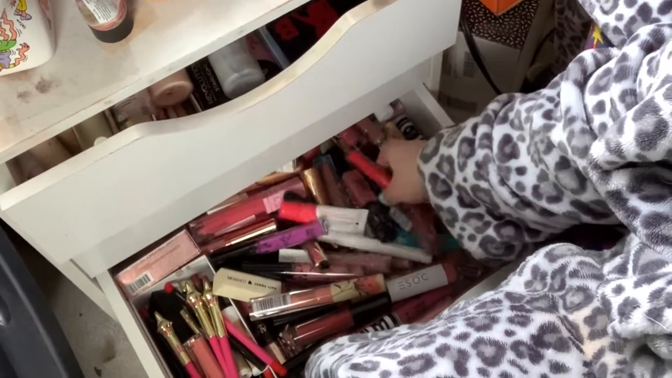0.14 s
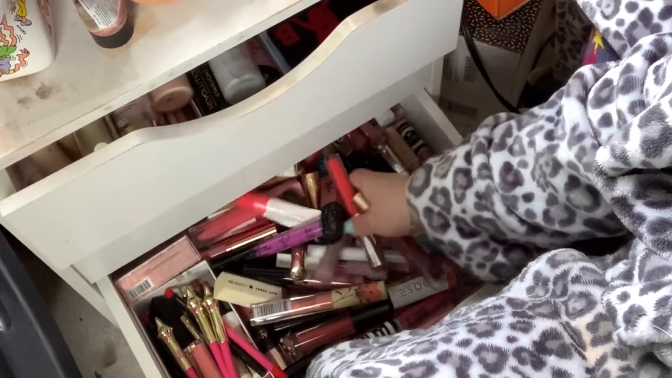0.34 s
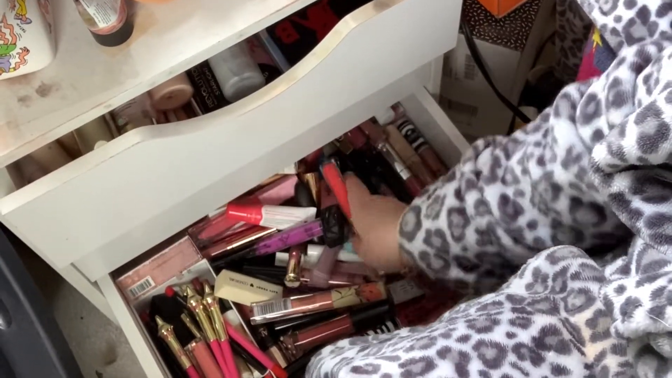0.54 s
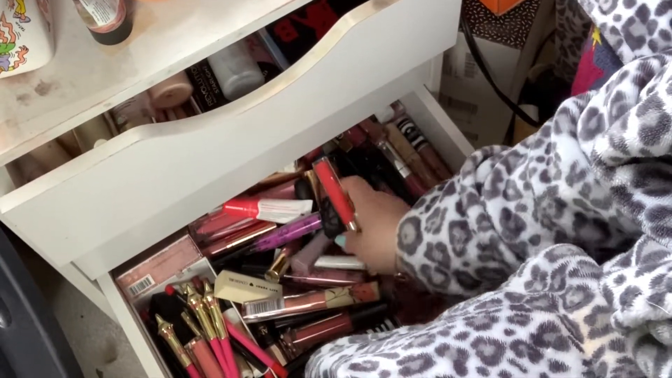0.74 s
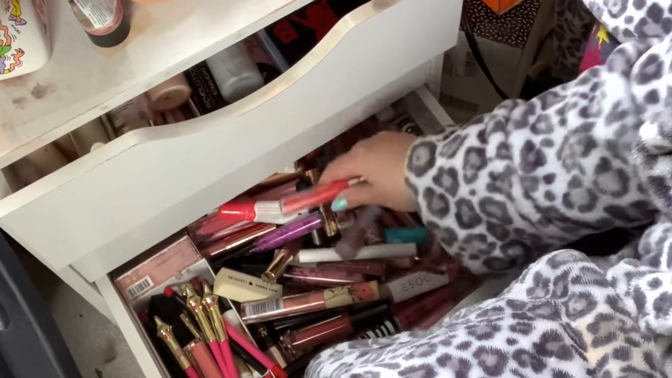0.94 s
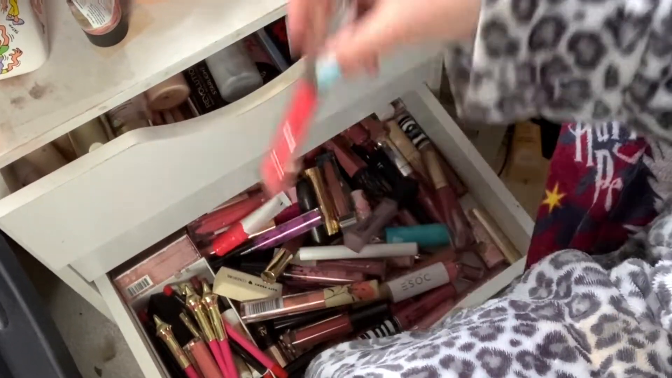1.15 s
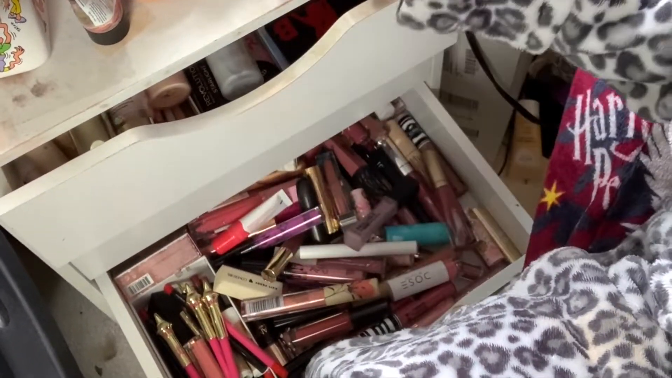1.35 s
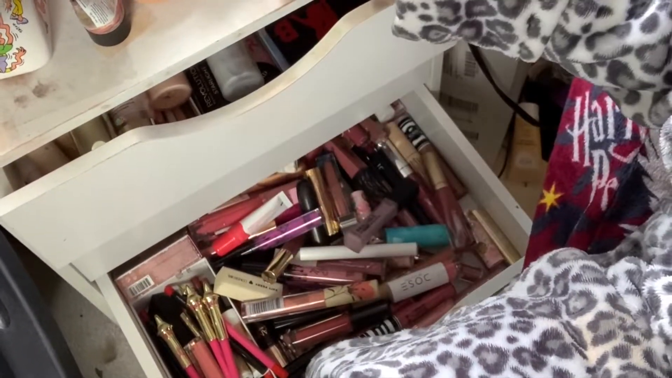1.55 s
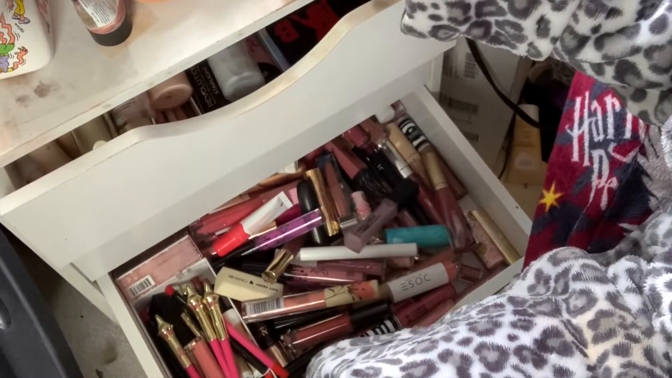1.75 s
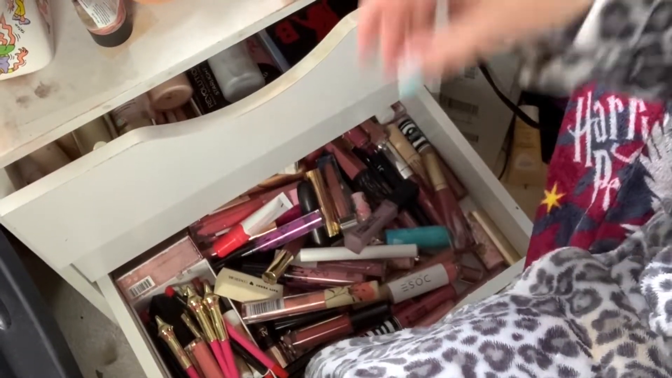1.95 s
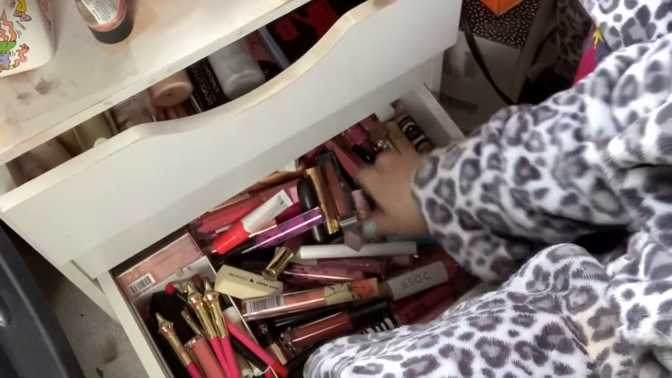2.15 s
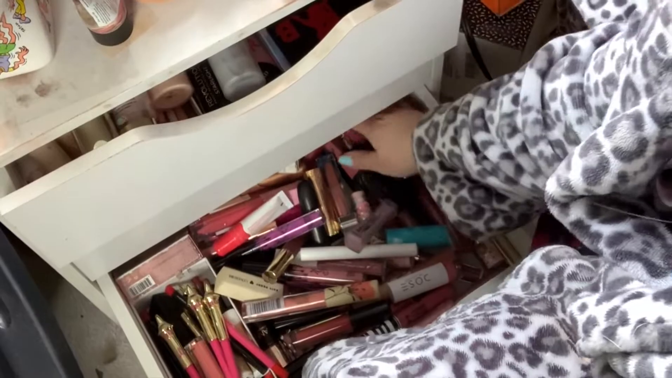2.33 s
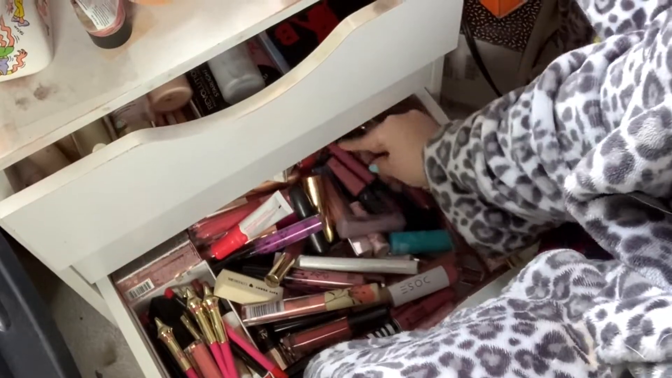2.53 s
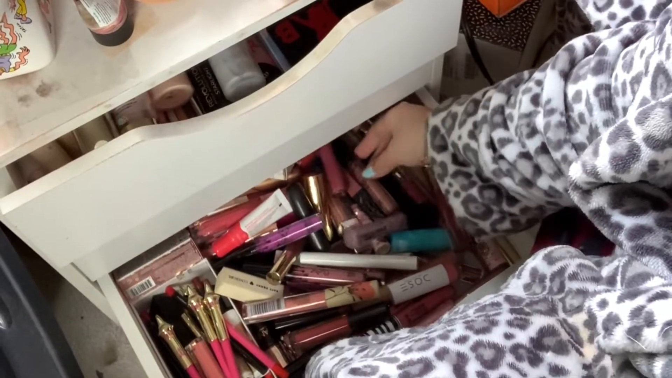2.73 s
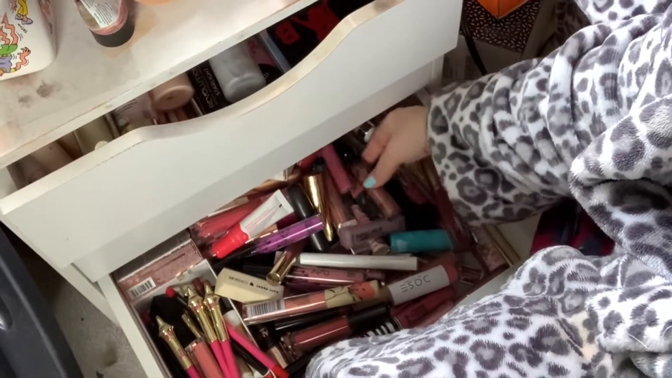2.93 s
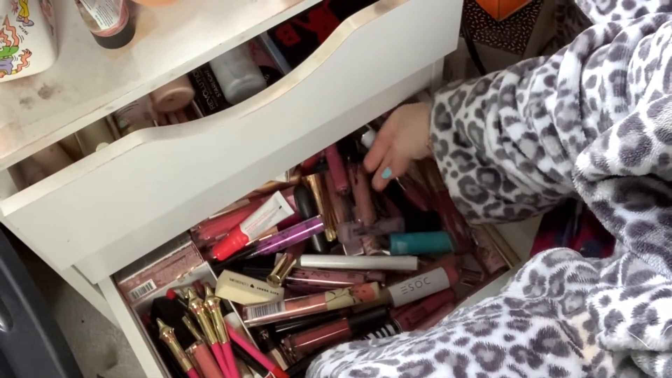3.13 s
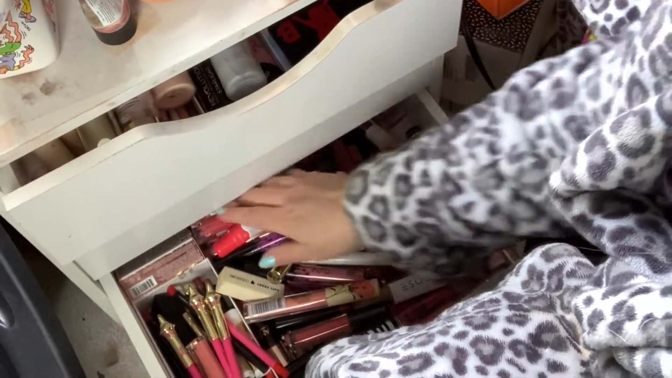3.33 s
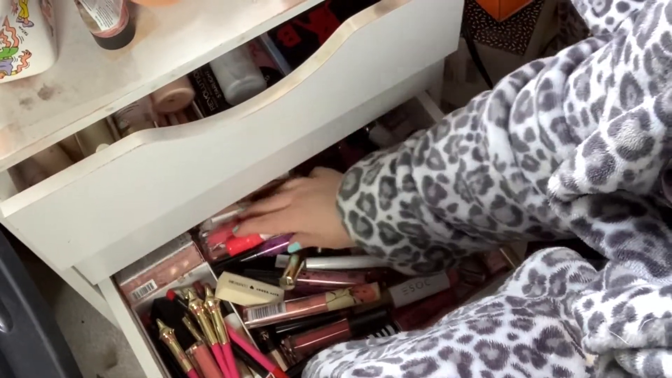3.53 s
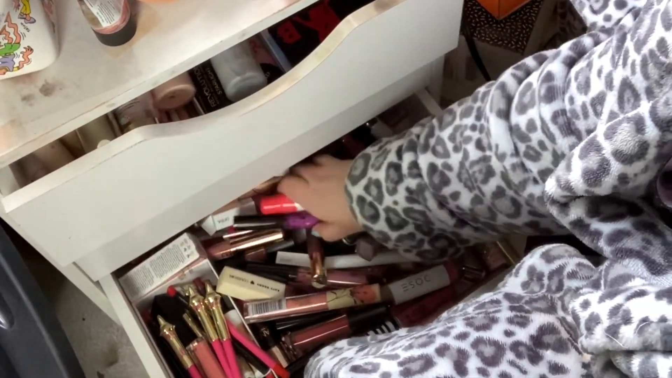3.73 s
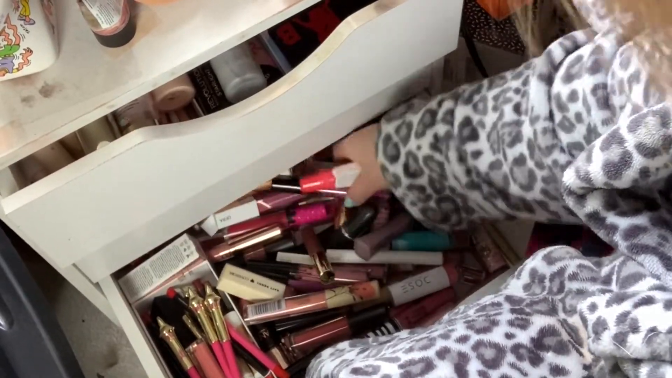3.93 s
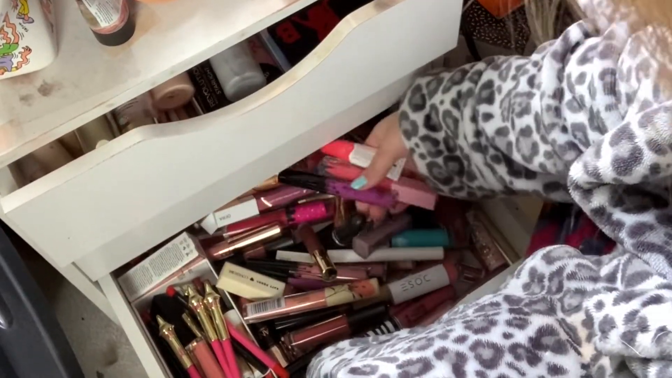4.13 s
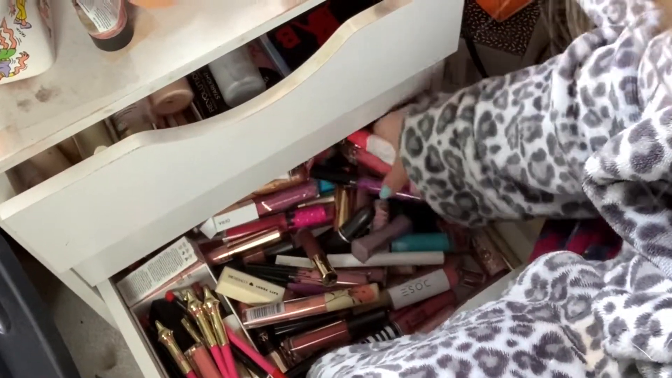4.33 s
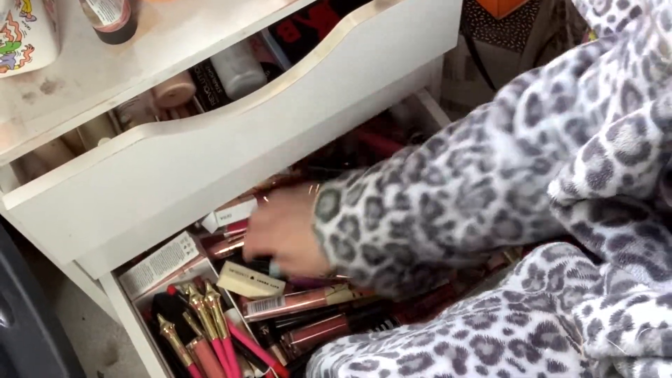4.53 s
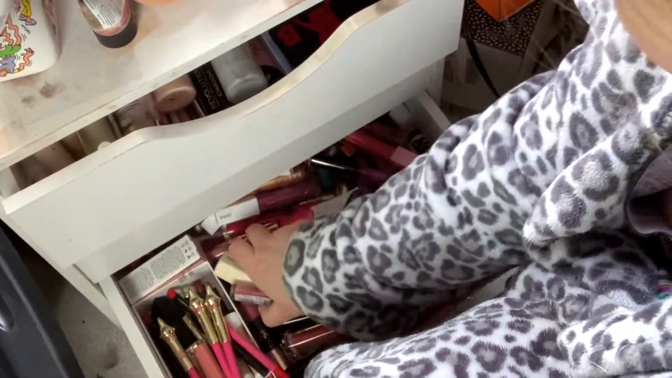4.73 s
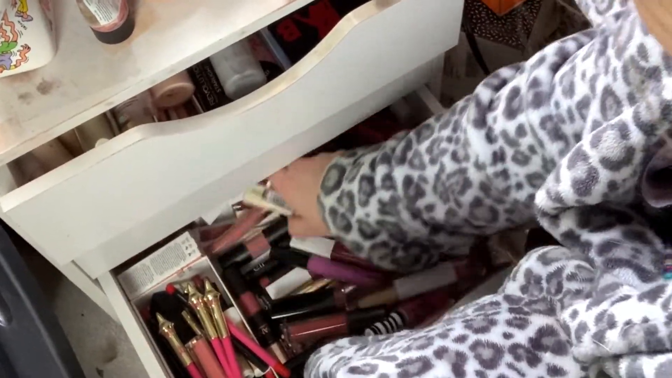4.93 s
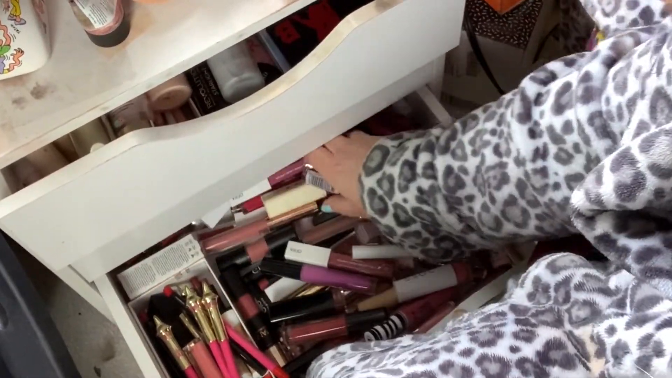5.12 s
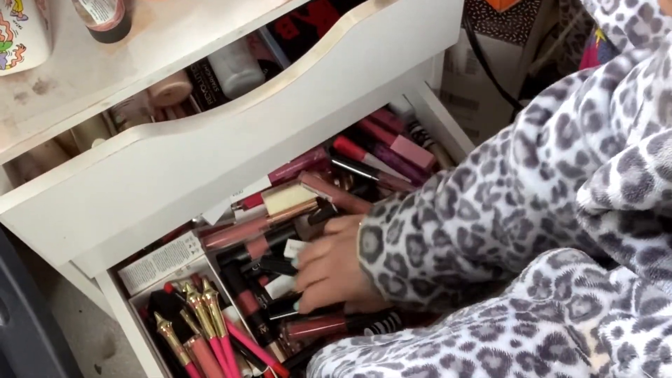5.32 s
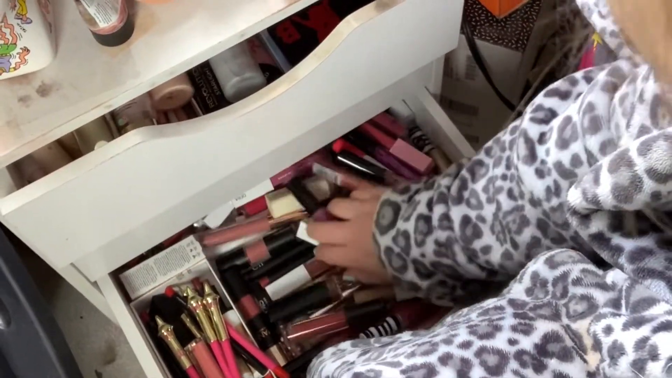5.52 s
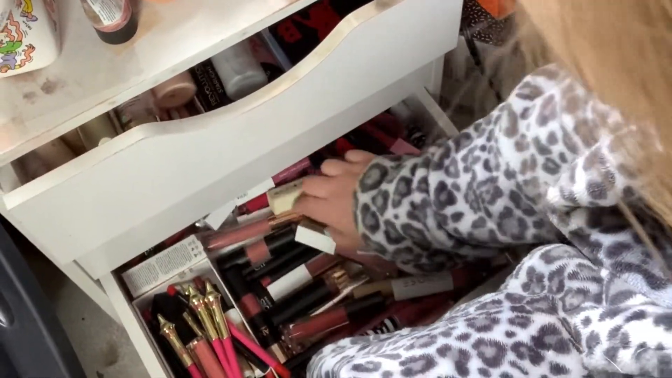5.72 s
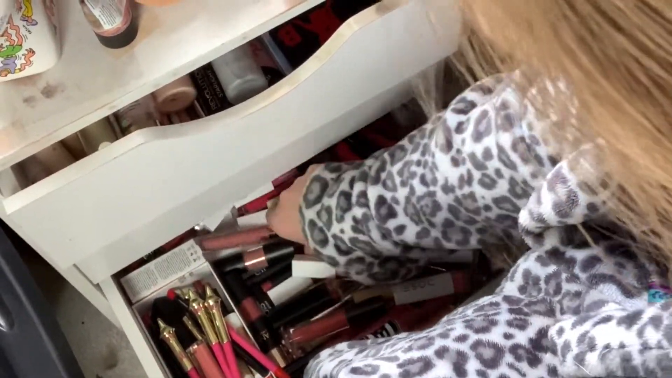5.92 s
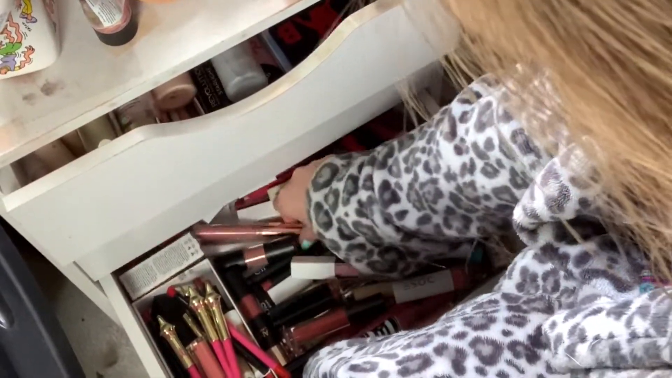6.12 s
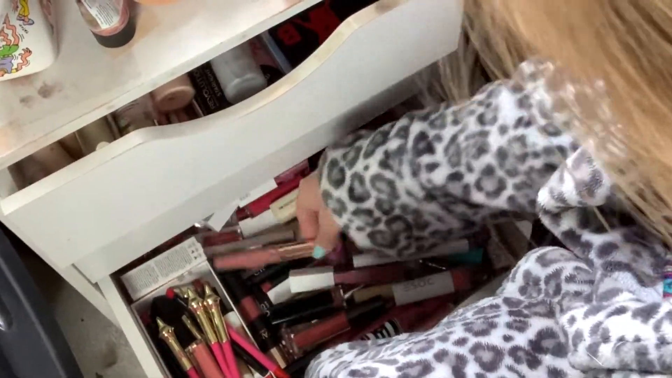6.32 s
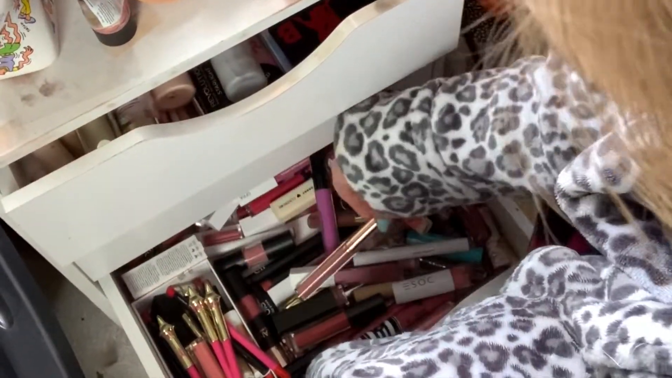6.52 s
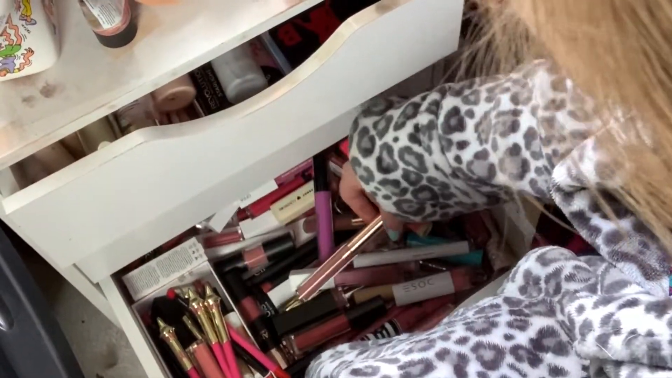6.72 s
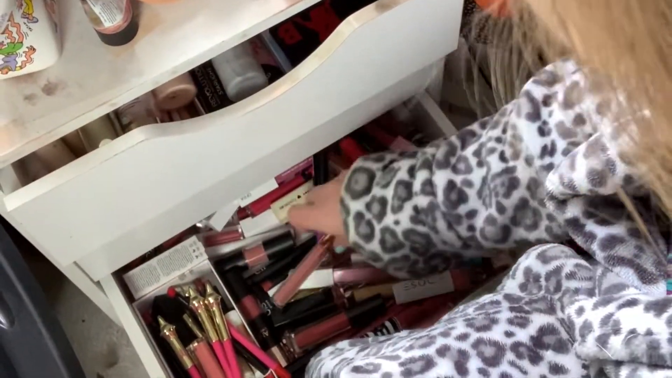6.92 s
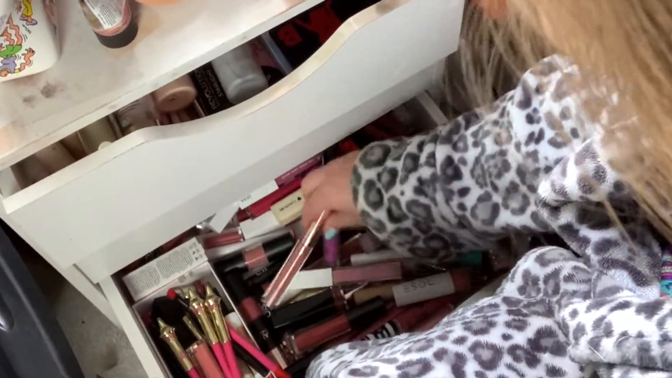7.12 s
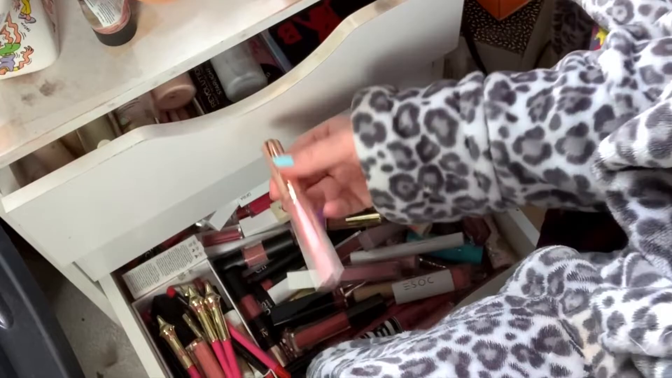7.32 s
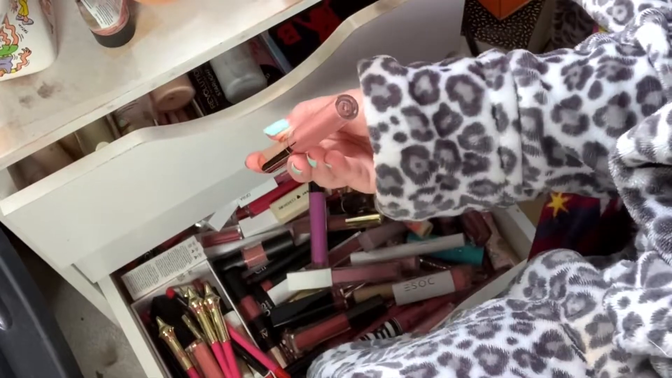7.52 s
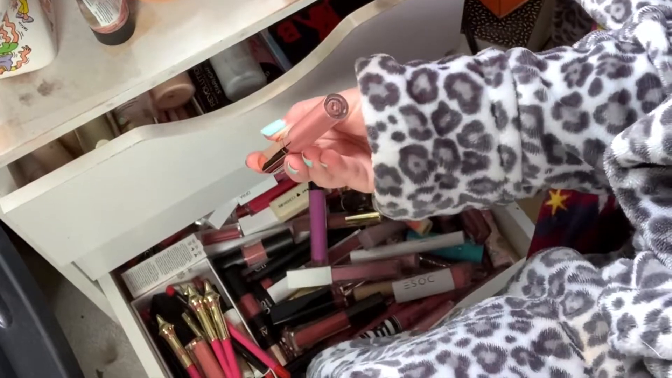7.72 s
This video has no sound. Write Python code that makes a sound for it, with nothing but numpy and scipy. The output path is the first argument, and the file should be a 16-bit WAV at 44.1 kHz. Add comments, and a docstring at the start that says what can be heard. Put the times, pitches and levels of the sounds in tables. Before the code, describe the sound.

Close stereo pickup of a drawer full of plastic lipstick tubes being stirred by hand. Dense sharp clicks and clatter fill the first second, then near silence with one click and soft sleeve rustle. Rummaging resumes after two seconds in uneven bursts with sliding hiss and dull drawer knocks, thins out after six seconds and ends nearly quiet in a small furnished room.

```python
"""Rummaging in a drawer of plastic cosmetics

A hand rummages through a drawer full of plastic lipstick tubes and makeup cases, in a small furnished room.
Each clear contact cracks, rings short plastic modes, rebounds, knocks the thin bottom and leaves a hum.
Between clicks the pile is many light random touches; sliding, cloth, rumble, boom and air are coloured noise.
One tube squeaks on its neighbour as a gliding tone; dull taps and thuds are decaying low modes."""
import sys
import numpy as np
from scipy import signal
from scipy.fft import rfft, irfft, next_fast_len
from scipy.io import wavfile
from scipy.ndimage import map_coordinates

SR = 44100
rng = np.random.default_rng(int(sys.argv[2]) if len(sys.argv) > 2 else 0)


def generate_wav(sig):
    """Save sig (samples, or channels by samples) to the path in sys.argv[1] as 16-bit PCM at SR."""
    pcm = np.round(np.clip(np.atleast_2d(sig).T, -1, 1) * 32767).astype(np.int16)
    wavfile.write(sys.argv[1], SR, pcm)


N = 342216

LAG_S = 2.3e-5  # mean delay of a contact at the left microphone


def amp(db):
    """Decibels to gain."""
    return 10 ** (np.asarray(db) / 20)


def unit(x):
    """Scale to rms 1."""
    return x / np.sqrt(np.mean(x ** 2) + 1e-20)


def along(points, hz):
    """(Hz, value) points read on a log frequency axis."""
    f, v = np.transpose(points)
    return np.interp(np.log(hz + 1), np.log(f + 1), v)


def wobble(rate):
    """A smooth random curve, rate knots a second."""
    knots = rng.standard_normal(int(N * rate / SR) + 4)
    return map_coordinates(knots, [np.arange(N) * rate / SR], order=2)


def filtered(x, response):
    """x times a response of frequency."""
    m = next_fast_len(N + 8192)
    return irfft(rfft(x, m) * response(np.fft.rfftfreq(m, 1 / SR)), m)[..., :N]


def add(track, s, sound):
    """Mix a stereo sound into the track at time s."""
    part = track[:, max(round(s * SR), 0):][:, :sound.shape[1]]
    part += sound[:, :part.shape[1]]


def diffuse(pair):
    """Two unrelated signals become a sound field whose channel likeness varies with frequency."""
    # correlation of the channels: (frequency [Hz], likeness [0-1])
    alike = [(60, 0.7), (280, 0.9), (640, 0), (1400, 0.4), (4000, 0.4), (12000, 0.3)]

    def mid_side_gain(hz):
        turn = np.arccos(np.clip(along(alike, hz), -1, 1)) / 2
        return np.array([np.cos(turn), np.sin(turn)])

    mid, side = filtered(pair, mid_side_gain)
    return np.array([mid + side, mid - side])


def noise(spectrum):
    """Diffuse coloured noise of rms 1."""
    white = rng.standard_normal((2, N))
    return unit(diffuse(filtered(white, lambda hz: amp(along(spectrum, hz)))))


def gestures(rows, attack_s, release_s):
    """Gain of (start, length, dB) holds: each swells before and fades after by 60 dB; the strongest leads."""
    t = np.arange(0, N / SR, .001)
    db = []
    for s, length, level in rows:
        before = np.maximum(s - t, 0) / attack_s
        after = np.maximum(t - s - length, 0) / release_s
        db.append(level - 60 * (before + after))
    return np.interp(np.arange(N) / SR, t, amp(np.max(db, axis=0)))


def ring(main_hz, low_hz, high_hz, t60, attack, main_db, scatter, lag_s, count=7):
    """One strong mode among random neighbours, with the energy of 8 ms at rms 1."""
    t = np.arange(SR // 50) / SR
    hz = low_hz * (high_hz / low_hz) ** ((np.arange(count) + rng.random(count)) / count)
    hz = np.append(main_hz, hz)[:, None]
    neighbours = rng.choice([-1, 1], count) * amp(rng.normal(0, 3.2, count))
    size = np.append(amp(main_db), neighbours)[:, None]
    life = t60 * np.exp(rng.normal(0, 0.41, hz.shape))
    # one microphone is a little nearer, and every mode radiates in its own pattern
    skew = np.pi * hz * lag_s + scatter * rng.standard_normal(hz.shape)
    modes = size * amp(-60 * t / life) * (1 - np.exp(-t / attack))
    pair = np.array([(modes * np.sin(2 * np.pi * hz * t + side * skew)).sum(0) for side in (-1, 1)])
    return pair / np.sqrt(np.sum(pair ** 2) / (2 * .008 * SR))


def air():
    """Steady coloured noise of the room's air."""
    # air colour: (frequency [Hz], relative density [dB/Hz])
    air_colour = [(18, -68), (30, -42.5), (106, 1), (145, -18.5), (233, -5.5), (287, -18.5), (2540, -36.5),
                  (3060, -35.5), (3310, -38.5), (5170, -36.5), (16000, -36)]
    return amp(-71.5) * noise(air_colour)


def drawer(effort):
    """The bottom booms with the stirring; the whole drawer rumbles, also when the arm leans on it."""
    # rumble colour: (frequency [Hz], relative density [dB/Hz])
    rumble_colour = [(20, -18), (45, -7), (76, -1.5), (93, 7), (112, -3), (135, -6), (200, -16.5),
                     (400, -47.5)]
    # boom colour of the bottom: (frequency [Hz], relative density [dB/Hz])
    boom_colour = [(120, -41.5), (195, -8.5), (245, -0.5), (300, -9), (370, -7), (440, -30.5), (900, -41.5)]
    # arm leans on the drawer: (hold start [s], hold length [s], rumble [dB])
    leans = [(2.48, 0.3, -57), (2.72, 0.26, -52), (3.87, 0.08, -65), (4.28, 0.17, -56.5),
             (4.98, 0.055, -81.5)]
    rest_db = -68  # slight shifting of the arm between strokes
    # levels at effort 1; exponents are dB per dB of effort
    rumble_db, rumble_grows = -62.5, 0.36
    boom_db, boom_grows = -52.5, 0.52
    rumble = amp(rest_db) + amp(rumble_db) * effort ** rumble_grows
    rumble = rumble + gestures(leans, attack_s=.4, release_s=.32)
    boom = amp(boom_db) * effort ** boom_grows * noise(boom_colour)
    return rumble * noise(rumble_colour) * amp([[1.8], [-1.8]]) + boom


def contact(knock_db, clack_db, snap_db, tick_db, knock_hz, clack_hz, snap_hz):
    """Hard edges tick, cap and tube ring, then the blow passes through the pile into the drawer bottom."""
    lag_s = rng.normal(LAG_S, 1.6e-5)  # as if from varying places in the drawer
    # the stronger the tick against the snap, the higher it is
    tick_hz = np.clip(9000 * 2 ** ((tick_db - snap_db) / 22), 6600, 12200)
    tick = ring(tick_hz, 6300, 13500, t60=.0055, attack=.0008, main_db=10, scatter=.4, lag_s=lag_s, count=20)
    snap = ring(snap_hz, 2900, 6500, t60=.007, attack=.0008, main_db=11, scatter=.4, lag_s=lag_s, count=10)
    clack = ring(clack_hz, 1100, 2800, t60=.01, attack=.0009, main_db=10, scatter=.38, lag_s=lag_s, count=7)
    knock = ring(knock_hz, 530, 950, t60=.0125, attack=.0018, main_db=15, scatter=.1, lag_s=lag_s, count=4)
    sound = amp(tick_db) * tick + amp(snap_db) * snap + amp(clack_db) * clack
    add(sound, .0006, amp(knock_db) * knock)
    return sound


def jostle(effort, count=80):
    """Many light touches among the tubes, and the hiss of plastic sliding on plastic."""
    # sliding hiss: (frequency [Hz], relative density [dB/Hz])
    slide_colour = [(300, -42.5), (600, -2), (1400, 10), (3000, -0.5), (6000, -8), (11000, -9.5),
                    (14000, -18.5), (16500, -35)]
    touches_per_s, touch_range_db = 210, 11  # range from lightest to firmest
    slide_db, slide_grows = -45.5, 0.8  # at effort 1; dB per dB of effort
    tubes = []
    for _ in range(count):
        levels_db = rng.normal([-3, 0, -3, -12], 3)
        pitches_hz = rng.uniform([580, 1150, 2900], [950, 2600, 5800])
        tubes.append(contact(*levels_db, *pitches_hz))
    touches = np.zeros((2, N))
    for when, which, force in rng.random((touches_per_s * N // SR, 3)):
        add(touches, when * N / SR, amp(touch_range_db * force ** 2) * tubes[int(which * count)])
    slide = unit(noise(slide_colour) * amp(5.6 * wobble(220)))
    return amp(-44.0) * effort * unit(touches) + amp(slide_db) * effort ** slide_grows * slide


def crack(snap_db, tick_db, t60):
    """The bare impact: a broadband snap that keeps more of its top when the edges are hard."""
    t = np.arange(SR // 100) / SR
    burst = rng.standard_normal(len(t)) * amp(-60 * t / t60)

    def band(lo, hi):
        sos = signal.butter(2, [lo, hi], "bandpass", fs=SR, output="sos")
        return unit(signal.sosfilt(sos, burst))

    sound = amp(snap_db) * band(900, 6000) + amp(tick_db) * band(6000, 13000)
    return np.array([np.roll(sound, rng.integers(0, 3)), sound])


def drawer_ring():
    """The drawer's panels hum on after a knock, at new strengths each time."""
    # slow panel modes: (frequency [Hz], relative level [dB], t60 [s])
    panel_modes = [(229, -20, .2), (248, -12, .16), (370, -21, .17), (445, -22, .12), (510, -12, .11),
                   (690, -15, .11), (910, -17, .08), (1205, -18, .07), (1315, -16, .07)]
    t = np.arange(SR // 5) / SR
    hum = np.zeros(len(t))
    for hz, db, t60 in panel_modes:
        fade = amp(db + 2 * rng.standard_normal() - 60 * t / t60)
        hum += fade * np.sin(2 * np.pi * (hz * rng.normal(1, 0.011) * t + rng.random()))
    return np.tile(hum * (1 - np.exp(-t / 0.0009)), (2, 1))


def clicks():
    """The clear contacts: a crack, the ring of the plastic, a light rebound and the hum of the drawer."""
    # clear contacts: (time [s], strength [dB], bottom knock [dB re strength], cap snap [dB re strength],
    #   edge hardness [dB re strength], knock [Hz], tube [Hz], cap [Hz]); part trims are added below
    contacts = [(0.0579, -33.5, -8, -3.5, -14, 921, 2760, 3050),
                (0.0676, -37.5, -9, -8, -11.5, 656, 2580, 3000),
                (0.1127, -17.5, -20, -15, -28, 530, 2520, 3520),
                (0.16, -24.5, -14, -11, -27, 718, 1380, 3820),
                (0.2006, -38.5, -4, -6, -18, 720, 1530, 3370),
                (0.2539, -26, -6.5, -12, -24.5, 700, 1360, 3670),
                (0.2826, -37, -5.5, -6, -19, 690, 2520, 2910),
                (0.2918, -25.5, -12, -7, -21.5, 927, 2730, 3120),
                (0.3053, -28, -14, -18, -16.5, 900, 2500, 3360),
                (0.3135, -10.5, -11, -10.5, -22.5, 682, 1283, 4000),
                (0.3606, -35.5, -15, 3, -26, 740, 1770, 3250),
                (0.3883, -25.5, -12.5, -6, -16.5, 744, 2670, 4540),
                (0.3985, -30, -3.5, -7, -17.5, 878, 2620, 4700),
                (0.4098, -33, -8, -12, -15, 690, 1930, 3550),
                (0.4226, -30, -18.5, -12, -37, 654, 2820, 3020),
                (0.438, -28, -16, -11, -40.5, 667, 1402, 4170),
                (0.5127, -37, -14, -14, -40, 709, 2190, 3870),
                (0.5692, -40.5, -13, -15, -27, 769, 1390, 2900),
                (0.5792, -37, -14.5, -8, -25, 686, 2580, 2900),
                (0.598, -17, -24, -11.5, -28, 764, 2555, 3430),
                (0.6227, -33.5, -11.5, 2, -8.5, 706, 2460, 4620),
                (0.635, -23, -20.5, -6, -1, 595, 1400, 3830),
                (0.6444, -21.5, -9.5, -9, -23, 610, 2780, 4090),
                (0.6588, -25.5, -12.5, -5, -16, 710, 1797, 3030),
                (0.711, -31.5, -12, -6.5, -22, 670, 1716, 4270),
                (0.741, -28.5, -12, -7.5, -14, 710, 2770, 3290),
                (0.7889, -43.5, -18, -13, -24.5, 726, 1980, 3820),
                (0.8018, -28.5, -17, 0, -31, 722, 1343, 3430),
                (0.82, -35.5, -9.5, -14, -18, 703, 1730, 3060), (0.8345, -28, -6, -7, -23, 678, 1950, 3310),
                (0.8418, -22, -7.5, -12, -27, 679, 2730, 3530),
                (0.8617, -24.5, -13.5, -8, -23.5, 579, 1390, 3250),
                (0.8952, -30.5, -8, -10.5, -27, 720, 1403, 3410),
                (0.9025, -18.5, -3.5, -7, -26.5, 671, 2480, 3750),
                (0.9214, -13.5, -6, -9, -26.5, 689, 1238, 4500),
                (0.9346, -19.5, -18, -7, -24, 990, 1170, 3980),
                (0.9491, -16.5, -17.5, -10.5, -22.5, 760, 1405, 3360),
                (0.9652, -20.5, -2, -6, -22.5, 690, 2670, 2850),
                (0.9867, -20.5, -8, -9, -25.5, 690, 1213, 3370),
                (1.0226, -11.5, -11, -10, -27, 683, 1403, 2870),
                (1.053, -20, -13, -8, -26, 860, 1387, 4550),
                (1.0653, -18.5, -8, -8.5, -23, 731, 1375, 4840),
                (1.0824, -25.5, -7, -4, -19.5, 676, 1213, 3430),
                (1.106, -27, -4.5, -5, -21, 720, 1187, 3930),
                (1.1379, -34.5, -8.5, -19, -31.5, 717, 1350, 4050),
                (1.1705, -31, -9.5, -12, -24, 718, 2480, 3030),
                (1.1857, -38.5, -6.5, -11.5, -19.5, 580, 2410, 4100),
                (1.465, -48, -20, 5, 0, 950, 2560, 3450), (1.4777, -16, -17.5, -9.5, -26, 864, 1440, 3480),
                (2.2728, -47, 0.5, -17, -44, 564, 1100, 3190),
                (2.3242, -47.5, -5.5, -21, -34, 660, 2780, 3050),
                (2.3671, -26.5, -3, -7.5, -21, 873, 1210, 3980),
                (2.4321, -35, 1, -6, -23.5, 910, 1150, 3510),
                (2.444, -27.5, -4.5, -11, -18, 880, 1400, 2910),
                (2.4587, -17.5, -11, -8.5, -30.5, 883, 1480, 3260),
                (2.4693, -21.5, -6, -3.5, -18, 753, 1840, 4260),
                (2.4952, -28, -4, -14, -32, 783, 1316, 4250),
                (2.5036, -26.5, -14, -3.5, -9, 940, 2280, 4100),
                (2.5211, -24.5, -10, -13, -26, 841, 1370, 3460),
                (2.5536, -18, -2.5, -8.5, -24, 856, 1260, 4050),
                (2.593, -29.5, -17.5, -14, -27.5, 760, 2190, 2900),
                (2.6124, -34, -10, -10, -18, 950, 1400, 3060),
                (2.7137, -29, -3, -6, -24.5, 880, 2230, 4230), (2.6238, -32, -2, -5, -25, 850, 1380, 2920),
                (2.6729, -20.5, -14.5, -6, -23, 701, 1740, 3800),
                (2.6848, -25, -6, -0.5, -9.5, 820, 1260, 4200),
                (2.694, -18.5, -6, -10, -28.5, 754, 1268, 2830),
                (2.721, -23.5, -8, -10, -28, 705, 1310, 4070),
                (2.7673, -12, -7.5, -10, -25, 724, 1276, 3540),
                (2.8482, -32, -14, -10.5, -39, 756, 1860, 3540),
                (2.8661, -34.5, -16, -14.5, -27, 523, 1350, 3970),
                (2.8827, -41.5, -3.5, -5.5, -25.5, 947, 1840, 3300),
                (2.9322, -44.5, -3, -1, -18, 707, 2400, 3380),
                (2.961, -34.5, -12, -12, -43, 790, 1360, 3830),
                (3.0071, -32, -3.5, -11, -30.5, 882, 1320, 4020),
                (3.0327, -22, -10, -4.5, -18.5, 790, 2440, 3840),
                (3.0853, -24, 0, -5.5, -19, 720, 2870, 2900),
                (3.1097, -36.5, -4.5, -5, -20, 660, 2806, 3370),
                (3.1273, -20.5, -5, -9.5, -29.5, 722, 1259, 3340),
                (3.1884, -39, -1, -2.5, -21, 916, 2670, 2980),
                (3.2009, -43, 3.5, -4, -21.5, 858, 1133, 4960),
                (3.2534, -10, -9, -12.5, -29.5, 720, 1380, 3470),
                (3.2561, -12.5, -12.5, -2, -19, 710, 1278, 3400),
                (3.2603, -13, 0.5, -3.5, -14.5, 678, 1308, 3450),
                (3.2785, -21, -12, -5, -26, 683, 2546, 4440),
                (3.3408, -46.5, -11.5, -6, -9.5, 658, 1303, 3050),
                (3.3734, -51, -4.5, -1.5, -12.5, 574, 2200, 3800),
                (3.4683, -39, -5.5, -11, -18.5, 875, 2570, 2990),
                (3.5061, -28, -14.5, -9, -18.5, 756, 2430, 3780),
                (3.5371, -31, -11, -4, -10, 527, 1563, 4800),
                (3.573, -33.5, -3, -7, -13.5, 740, 2817, 2960),
                (3.613, -27.5, -4.5, -9, -11.5, 668, 2490, 6000),
                (3.6226, -11, -1.5, -7, -7.5, 717, 2620, 2700),
                (3.6404, -20.5, -4, -4.5, -16, 855, 2735, 4070),
                (3.653, -19.5, -8.5, -8, -22, 702, 2514, 2970),
                (3.678, -26, -16, -3.5, -24, 754, 2720, 5480),
                (3.7105, -34.5, -19.5, 2, -23.5, 788, 2560, 2900),
                (3.7338, -12.5, -11.5, -6, -24.5, 732, 2464, 3820),
                (3.7744, -33, -17.5, -16, -30, 870, 1765, 3820),
                (3.7911, -31, -3.5, -4, -17, 970, 2845, 3750),
                (3.8138, -30, -10, -14, -29.5, 675, 2530, 2860),
                (3.8227, -29.5, -13, -6, -13, 682, 1310, 3830),
                (3.857, -22, -2, -7.5, -15, 716, 1304, 2870), (3.8663, -18, -5.5, -9, -23, 728, 1500, 4800),
                (3.8854, -20.5, -12, -10, -31, 710, 2650, 4370),
                (3.9053, -19, -2, -8, -14.5, 906, 2430, 3920),
                (3.9116, -18.5, -3, -4.5, -20.5, 910, 2307, 3900),
                (3.9193, -19.5, -8, -19, -26, 907, 2610, 3330),
                (3.9803, -13, -14.5, -7, -25, 683, 1343, 3350), (4.0373, -46, -14, 1, -5, 870, 2770, 2940),
                (4.051, -38, -4, 3, -11, 720, 2720, 5120), (4.0809, -41, -13, -23, -30, 730, 1590, 4830),
                (4.1355, -45.5, -3.5, 4.5, -11, 934, 2490, 3860),
                (4.254, -33, -14, -14.5, -31, 568, 1450, 3450),
                (4.2909, -31.5, -20, -13, -41, 965, 2710, 2940),
                (4.3147, -26, -9, -5.5, -11, 863, 1300, 2800),
                (4.3406, -24.5, -13.5, -7, -25.5, 684, 1314, 3860),
                (4.3686, -15.5, -6, -3.5, -24, 763, 1285, 2920),
                (4.381, -12.5, -12, -10, -28, 770, 1360, 2960), (4.46, -45, 2.5, -22, -37, 674, 1290, 3310),
                (4.493, -14, -2.5, -6, -22.5, 707, 2690, 3300),
                (4.5351, -23.5, -7, -13, -31, 850, 1377, 3010),
                (4.5416, -24, -0.5, -4.5, -8.5, 723, 1177, 2900),
                (4.573, -24, -3.5, -0.5, -10.5, 685, 2360, 3330),
                (4.6017, -18, -10.5, -8, -12.5, 700, 1400, 3600),
                (4.615, -26, -5, -2.5, -18, 716, 2390, 2830), (4.6346, -28, -17, -13, -20, 720, 1810, 3560),
                (4.651, -32, -25, -8, -18, 708, 1360, 2900), (4.663, -27.5, -9, -6, -13, 710, 2350, 3460),
                (4.7735, -26.5, -15, -7, -23, 540, 1300, 4250),
                (4.7787, -20, -17.5, -18, -20, 660, 1330, 4130),
                (4.829, -33, -16, -14, -21, 643, 1720, 3380), (4.8371, -25, -14, -17, -29, 660, 1750, 3260),
                (4.8479, -27.5, -3.5, -7, -19, 736, 1480, 3750),
                (4.8776, -19.5, -12, -20, -23.5, 744, 1353, 4530),
                (4.9002, -18, -10, -5, -19, 782, 1250, 4090),
                (4.8875, -16.5, -11.5, -10, -23.5, 764, 1470, 4270),
                (4.9061, -19, -2, -6, -18, 837, 2760, 3450),
                (4.9337, -19, -8.5, -11.5, -26, 720, 1270, 3630),
                (4.9398, -19.5, -5, -9, -24, 732, 1302, 2910),
                (4.9681, -28.5, -12, -5, -17.5, 700, 1460, 5100),
                (4.9788, -27, -12, -3.5, -12, 800, 1335, 3910),
                (4.998, -25, -10, -2, -12.5, 740, 1480, 2980),
                (5.0329, -25, -13, -3, -19.5, 840, 1304, 3830),
                (5.0444, -28, -4.5, -9, -13, 690, 1320, 4600),
                (5.0752, -14, -4.5, -9.5, -25.5, 727, 1360, 4250),
                (5.0996, -21.5, -16, -4.5, -14, 750, 1300, 4600),
                (5.1444, -18, -3, -1, -13, 715, 2770, 4110),
                (5.2022, -15.5, -18, -10.5, -30.5, 820, 1440, 3770),
                (5.3021, -28, -6.5, -11, -25.5, 710, 1390, 2900),
                (5.329, -42.5, -16, -3, -15.5, 760, 1320, 3390),
                (5.3513, -23.5, -14, -6.5, -23, 742, 1360, 3900),
                (5.3609, -32, -17, 1, -13, 704, 1330, 3420), (5.3699, -32.5, -25, -8, -19, 620, 1746, 2910),
                (5.4003, -35.5, -10.5, -2, -21, 590, 1190, 2910),
                (5.3841, -28.5, -15.5, -5, -18.5, 720, 1330, 3410),
                (5.4164, -20, -13, -6, -19, 873, 2680, 5100),
                (5.4252, -22, -10.5, -5.5, -20, 713, 2650, 4830),
                (5.4785, -32, -3, -3, -17.5, 980, 2750, 5800),
                (5.4946, -31.5, -8.5, -1, -25.5, 730, 1770, 3330),
                (5.507, -34, -4.5, -7, -9.5, 720, 1200, 2930),
                (5.5305, -14, -1, -3.5, -20, 705, 1370, 3950),
                (5.5453, -16.5, -0.5, 0.5, -11, 687, 2524, 2830),
                (5.5928, -37, -3.5, 0, -2, 538, 1950, 4960),
                (5.6077, -40.5, -7.5, 1, -5.5, 697, 1950, 6200),
                (5.6139, -36.5, 1.5, 7.5, -7, 748, 1120, 5540),
                (5.633, -24.5, -8, -4.5, -23, 706, 1190, 3700),
                (5.685, -29.5, -11, -15, -44, 710, 1330, 3920),
                (5.7113, -19.5, -6, -8.5, -24, 700, 1405, 3200),
                (5.738, -28.5, -3, -9, -17, 677, 1180, 2900),
                (5.7539, -27.5, -7, -6.5, -18, 735, 1520, 3670),
                (5.7632, -26, -30, -19, -33, 643, 1510, 3770),
                (5.788, -29, -9, -10, -22.5, 560, 1330, 4770), (5.8182, -41, -7, 5.5, -10, 570, 1370, 5400),
                (5.8437, -35.5, -13, 4, -14, 590, 1270, 4740),
                (5.8648, -27.5, -8.5, -6, -19, 718, 1360, 3840),
                (5.871, -27.5, -24.5, -2, -5.5, 730, 1290, 3900),
                (5.881, -23, -12, -17, -28, 677, 1290, 3680), (5.902, -27, -12, 2, -11, 765, 1360, 5500),
                (5.9623, -30.5, -11.5, -5, -18, 713, 1740, 2960),
                (6.0393, -30.5, 4, -7, -15, 687, 2640, 5850), (6.0629, -22.5, -9, -3, -12, 775, 2700, 6350),
                (6.1697, -21, -12, -2, -13.5, 714, 1410, 4400),
                (6.2008, -27, -13.5, -12, -32.5, 730, 1787, 3260),
                (6.3009, -33, -13, -14, -28, 758, 1326, 2900),
                (6.3219, -24.5, -14, -5.5, -23.5, 782, 1340, 3400),
                (6.3521, -24, -9.5, -8, -24.5, 684, 2216, 3430),
                (6.3924, -27, -5, 1.5, -10, 690, 2740, 3830),
                (6.3984, -19, -11, -4.5, -19.5, 725, 1450, 2880),
                (6.408, -21, -19.5, -15, -30, 714, 1360, 2850),
                (6.4364, -16.5, 3.5, 0, -10.5, 663, 1687, 3370),
                (6.4639, -22, -11, -3, -16, 707, 1365, 6050), (6.618, -50.5, -20, -6, -22, 808, 1305, 4530),
                (6.648, -49, -12, -12, -31, 690, 1150, 5070),
                (6.6613, -36.5, -16, -5, -20.5, 544, 2730, 2900),
                (6.845, -51, -12, -5, -18.5, 870, 1320, 3400),
                (6.8807, -24, -8.5, -9, -14.5, 700, 1830, 4080),
                (6.8955, -34, -25, 3, -12.5, 715, 2760, 4870),
                (6.9037, -27.5, -29, -5, -18, 706, 1515, 4100),
                (6.936, -18.5, -15, -8, -24, 597, 1350, 4700),
                (6.949, -29.5, -22, -5.5, -17, 960, 2760, 2930),
                (7.0345, -39.5, -10, -24, -43, 650, 2320, 2920),
                (7.0583, -31.5, -17, -11.5, -29.5, 700, 2760, 3030),
                (7.0783, -32.5, -11, -11, -35, 640, 1570, 3900),
                (7.1109, -40.5, -12, -10, -19, 690, 1520, 3670),
                (7.1532, -51.5, 1, -6, -31, 980, 2750, 2880),
                (7.1955, -28.5, -20, -5, -26, 684, 1320, 3300),
                (7.2135, -20.5, -9.5, -9.5, -28, 770, 2700, 3360),
                (7.3318, -65.5, -6, -13, -26, 960, 1566, 3930)]
    knock_trim_db, clack_trim_db, snap_trim_db, tick_trim_db = -5, -10.5, -5.5, 4
    lead_min_s, lead_max_s, lead_db = 0.0008, 0.0026, -13.5  # a faint noise burst 1-3 ms before each click
    # a tube lands on one end, then more lightly on the other
    rebound_min_s, rebound_max_s, rebound_db = .004, .016, -15.5
    hum_db, hum_grows, firm_knock_db = -34.5, 0.66, -33  # hum at a firm knock; dB of hum per dB of knock
    track = np.zeros((2, N))
    for s, db, weight_db, cap_db, hard_db, knock_hz, tube_hz, cap_hz in contacts:
        knock_db, clack_db = db + weight_db + knock_trim_db, db + clack_trim_db
        snap_db, tick_db = db + cap_db + snap_trim_db, db + hard_db + tick_trim_db
        lead_s = rng.uniform(lead_min_s, lead_max_s)
        rebound_s = rng.uniform(rebound_min_s, rebound_max_s)
        blow = contact(knock_db, clack_db, snap_db, tick_db, knock_hz, tube_hz, cap_hz)
        edge = crack(snap_db, tick_db, t60=0.007)
        add(track, s - lead_s, amp(lead_db) * edge)
        add(track, s, amp(-13.5) * edge)
        add(track, s, amp(-3.5) * blow)
        add(track, s + rebound_s, amp(rebound_db) * blow)
        add(track, s, amp(hum_db + hum_grows * (knock_db - firm_knock_db)) * drawer_ring())
    return track


def near_echoes(x, t60):
    """Quick separate echoes off drawer walls and desk; their random paths are redrawn every 40 ms."""
    echoes_per_s = 3000
    t = np.arange(SR // 20) / SR
    fade = amp(-60 * t / t60) * np.clip(t / 0.0013 - 1, 0, 1)
    wet, step = np.zeros((2, N)), SR // 25
    for i in range(0, N, step):
        signs = rng.choice([-1, 1], (2, len(t)))
        walls = fade * signs * (rng.random((2, len(t))) < echoes_per_s / SR)
        walls = walls / np.linalg.norm(walls, axis=1, keepdims=True)
        add(wet, i / SR, signal.fftconvolve(x[:, i:i + step], walls, axes=1))
    return wet


def room(x, early_t60, late_t60, late_db, treble_lingers, count=11):
    """The room stores the energy of each band and gives it back as a noise wash."""
    t = np.arange(SR * 3 // 10) / SR
    edges = np.geomspace(400, 16000, count + 1)
    wet = np.zeros((2, N))
    for band in zip(edges, edges[1:]):
        band_t60 = late_t60 * (band[0] / 2000) ** treble_lingers
        # energy decay, so dB count double in amp()
        decay = amp(-120 * t / early_t60) + amp(2 * late_db - 120 * t / band_t60)
        decay = decay * np.clip(t / 0.004 - 1, 0, 1)
        sos = signal.butter(4, band, "bandpass", fs=SR, output="sos")
        power = np.mean(signal.sosfilt(sos, x) ** 2, axis=0)
        energy = signal.fftconvolve(power, decay / decay.sum())[:N]
        wet += np.sqrt(np.abs(energy)) * unit(signal.sosfilt(sos, rng.standard_normal((2, N))))
    return wet


def thuds():
    """The hand presses the pile down and rings one low mode of the drawer bottom, near 255 Hz."""
    # presses: (time [s], level before the 7 dB lift [dB])
    presses = [(0.415, -49), (0.969, -37), (1.091, -42), (2.467, -37), (2.845, -51), (3.905, -30.5),
               (4.494, -39)]
    thud_hz, thud_t60_s, thud_attack_s = 255, .13, 0.0077
    track, t = np.zeros((2, N)), np.arange(SR // 5) / SR
    for s, db in presses:
        mode = np.sin(2 * np.pi * thud_hz * rng.normal(1, .02) * t) * (1 - np.exp(-t / thud_attack_s))
        add(track, s, np.tile(amp(db + 7 - 60 * t / thud_t60_s) * mode, (2, 1)))
    return track


def sleeve():
    """The fleece sleeve brushes in uneven little strokes of soft noise."""
    # sleeve moves: (hold start [s], hold length [s], level [dB])
    swishes = [(1.3, 0.42, -79.5), (1.84, .15, -76), (2.05, 0.36, -68), (6.62, 0.052, -68),
               (7.28, 0.11, -77.5), (7.48, 0.069, -81.5)]
    # cloth colour: (frequency [Hz], relative density [dB/Hz])
    fleece = [(120, -24.5), (250, 7.5), (400, 3.5), (900, -1), (1300, -12), (2500, -28.5), (6000, -37.5),
              (16000, -43.5)]
    return gestures(swishes, attack_s=.5, release_s=0.7) * amp(2.8 * wobble(31)) * noise(fleece)


def taps():
    """Faint dull taps, while the hand is out of the drawer, ring only two low groups of modes."""
    # soft contacts: (time [s], level before the -3.5 dB trim [dB])
    soft_contacts = [(1.715, -62), (1.789, -60), (1.929, -59), (1.996, -62.5), (7.376, -69)]
    low_hz, high_hz, high_db = 864, 1550, -4.5
    track = np.zeros((2, N))
    for s, db in soft_contacts:
        low = ring(low_hz, 650, 1000, t60=0.039, attack=0.0011, main_db=22, scatter=0.27, lag_s=LAG_S, count=4)
        high = ring(high_hz, 1100, 2324, t60=0.02, attack=0.00079, main_db=19, scatter=0.4,
                    lag_s=LAG_S, count=5)
        add(track, s, amp(db - 3.5) * (low + amp(high_db) * high))
    return track


def glides():
    """A fingertip slides over the pile with a thin hiss."""
    # glides: (hold start [s], hold length [s], level [dB])
    glide_moves = [(3.34, 0.14, -63.5), (4.69, 0.079, -65), (6.725, .025, -78)]
    # hiss colour: (frequency [Hz], relative density [dB/Hz])
    glide_colour = [(2500, -32), (5500, -3), (8000, -2), (13000, -3), (16000, -16.5)]
    return gestures(glide_moves, attack_s=.12, release_s=.12) * amp(2 * wobble(60)) * noise(glide_colour)


def squeak():
    """Smooth plastic sticks and slips in a faint, unsteady tone that rises, then sags."""
    # pitch of the rub: (time [s], frequency [Hz])
    pitch = [(4.16, 1377), (4.185, 1460), (4.21, 1518), (4.24, 1525), (4.275, 1595), (4.3, 1530),
             (4.34, 1470)]
    # a tube rubs on its neighbour: (hold start [s], hold length [s], level [dB])
    rubs = [(4.176, 0.0068, -59), (4.205, 0.0091, -47), (4.235, 0.0067, -48), (4.268, 0.0099, -53),
            (4.299, .012, -49), (4.325, .01, -61)]
    hz = np.interp(np.arange(N) / SR, *np.transpose(pitch))
    phase = 2 * np.pi * np.cumsum(hz * (1 + 0.01 * wobble(260))) / SR
    octave = amp(-33 + 3 * wobble(50)) * np.sin(2 * phase)
    tone = (np.sin(phase) + octave) * amp(3 * wobble(140))
    return tone * gestures(rubs, attack_s=0.061, release_s=0.073)


def scene():
    """The hand's effort stirs the pile and its drawer; the room answers over steady air."""
    # strokes of the hand through the pile: (hold start [s], hold length [s], effort [dB])
    strokes = [(0.02, 0.056, -51.5), (0.135, 0.28, -51.5), (0.61, 0.071, -48.5), (0.72, 0.32, -56.5),
               (0.90, 0.19, -39), (2.29, 0.03, -73), (2.38, 0.092, -44.5), (2.45, 0.082, -36.5),
               (2.61, 0.1, -48), (2.82, 0.22, -65), (3.03, 0.11, -57.5), (3.24, 0.054, -48),
               (3.36, .08, -72), (3.50, 0.4, -49), (3.608, 0.043, -38), (3.66, 0.36, -54),
               (3.83, 0.083, -39.5), (4.3, 0.38, -59.5), (4.5, 0.14, -40), (4.67, 0.054, -55.5),
               (4.8, 0.14, -48), (4.87, 0.19, -36.5), (5.14, 0.07, -77), (5.24, 0.032, -48.5),
               (5.36, 0.1, -47.5), (5.49, 0.0612, -44), (5.59, 0.028, -50.5), (5.72, 0.2, -47.5),
               (6.04, 0.0049, -38), (6.13, 0.086, -52.5), (6.31, 0.095, -48), (6.62, 0.065, -71.5),
               (6.715, 0.023, -68), (6.89, 0.046, -48), (7.04, 0.078, -63), (7.17, 0.12, -71)]
    firm_db = -42  # stroke level that counts as effort 1
    effort = gestures(strokes, attack_s=0.026, release_s=0.18) / amp(firm_db)
    pile = clicks() + taps() + jostle(effort)
    echoes = amp(-7.5) * near_echoes(pile, t60=.055)
    wash = room(pile, early_t60=0.16, late_t60=0.16, late_db=-11.0, treble_lingers=.15)
    reflected = diffuse(echoes + amp(-10.5) * wash)
    return pile + reflected + squeak() + glides() + drawer(effort) + thuds() + sleeve() + air()


def record(dry):
    """The colour of each microphone and the band limit."""
    # response shared by both microphones: (frequency [Hz], gain [dB])
    microphone = [(20, -16), (60, -18.5), (120, -8.5), (220, -3.5), (430, 0.5), (650, 4.5), (1050, 1.5),
                  (1400, 0.5), (3000, 0), (8000, -4.5), (10000, -7.5), (13000, -10.5), (14500, -7.5),
                  (16000, -18.5)]
    # left microphone minus right: (frequency [Hz], difference [dB])
    balance = [(300, 1), (700, -0.5), (950, 3), (1200, -6), (1700, -1), (2300, 1), (3300, -1), (8000, 0)]
    top_hz = 16200

    def response(hz):
        sides_db = along(balance, hz) * np.array([[.5], [-.5]])
        return amp(along(microphone, hz) + sides_db) * (hz < top_hz)

    return filtered(dry, response)


dry = scene()
out = record(dry)
generate_wav(out)
```